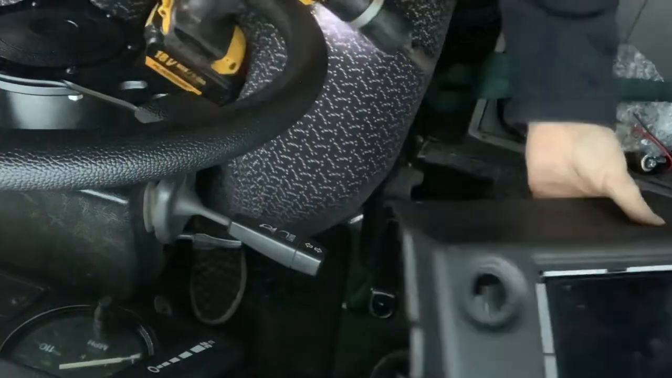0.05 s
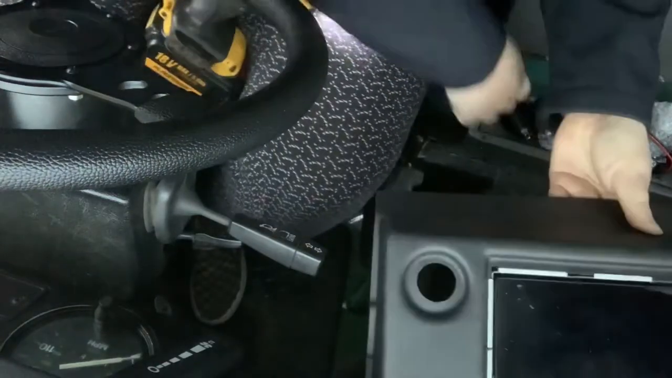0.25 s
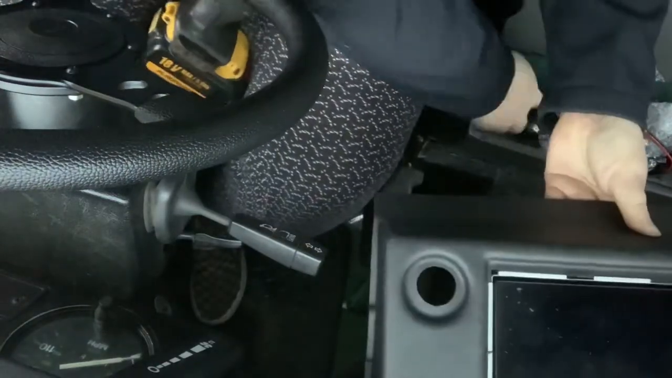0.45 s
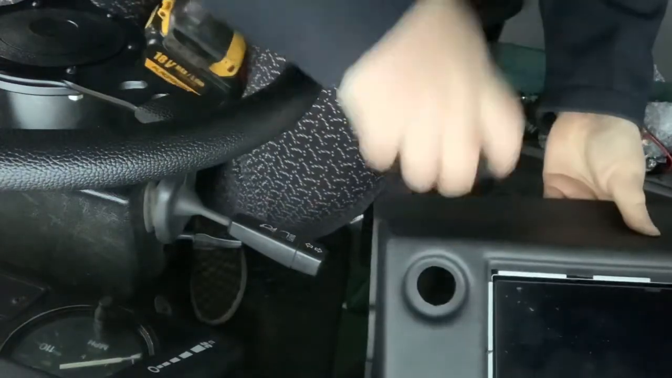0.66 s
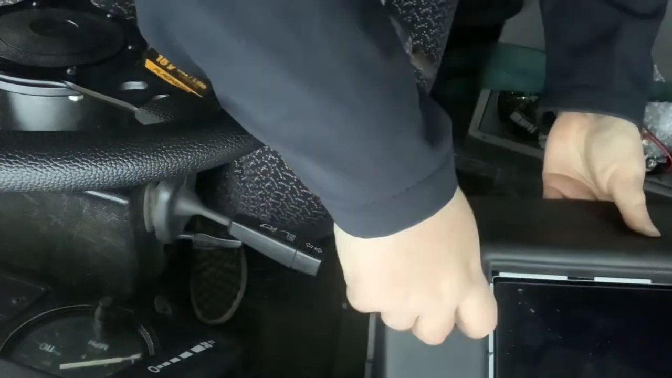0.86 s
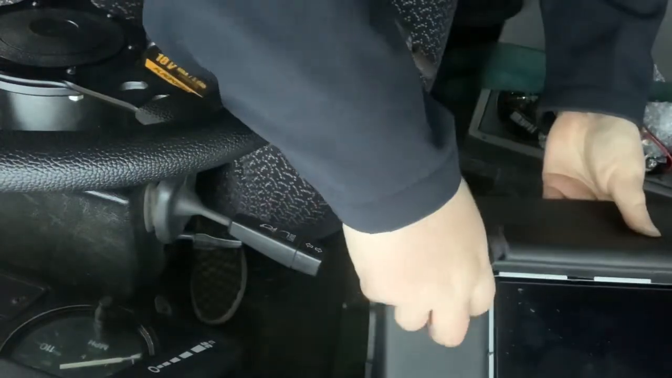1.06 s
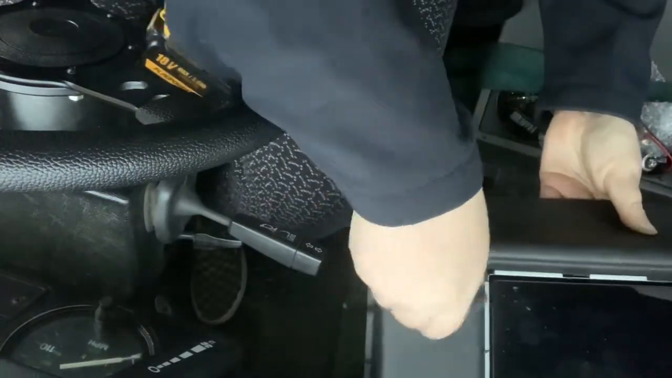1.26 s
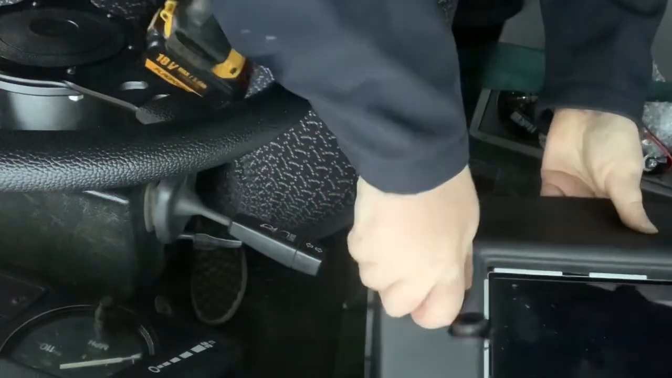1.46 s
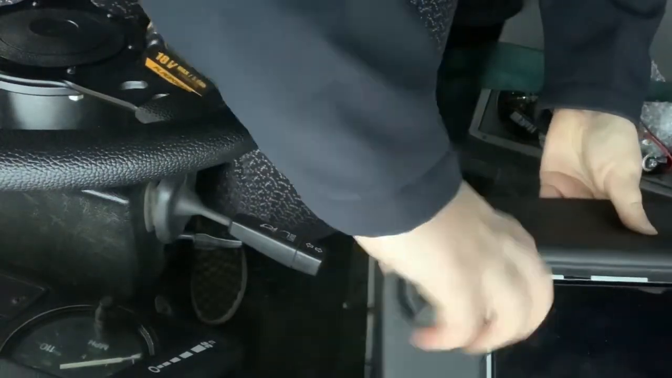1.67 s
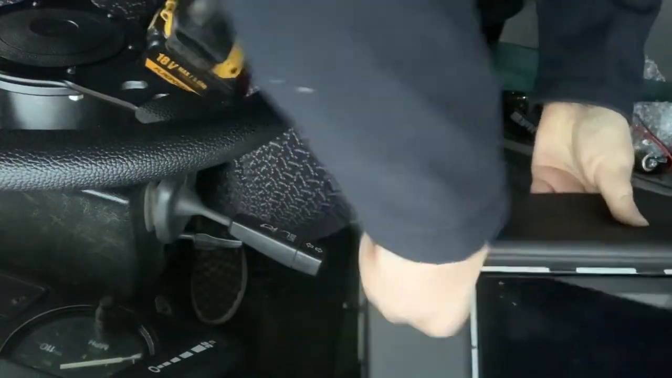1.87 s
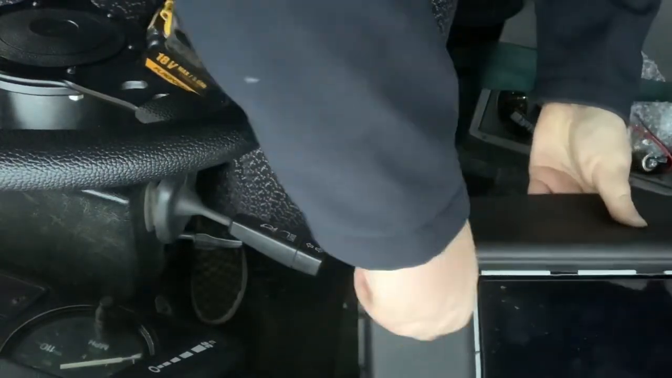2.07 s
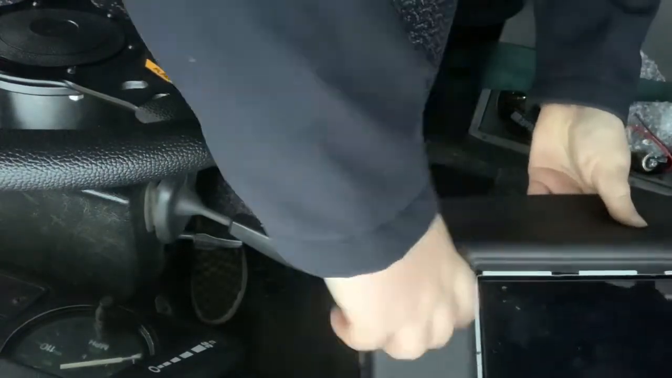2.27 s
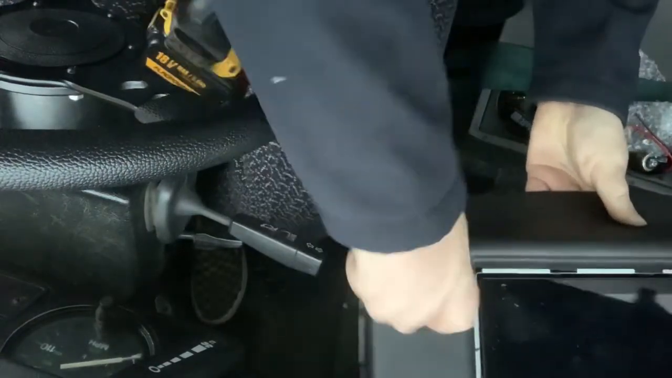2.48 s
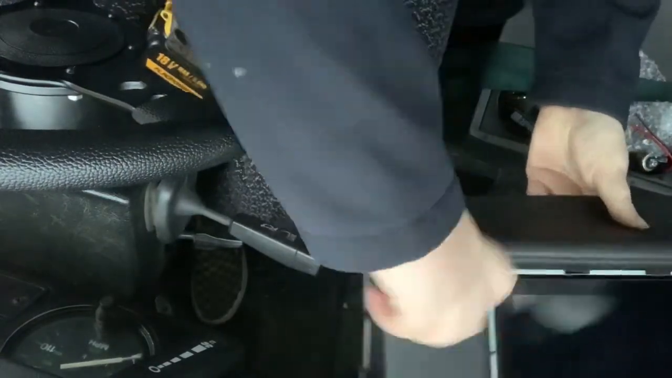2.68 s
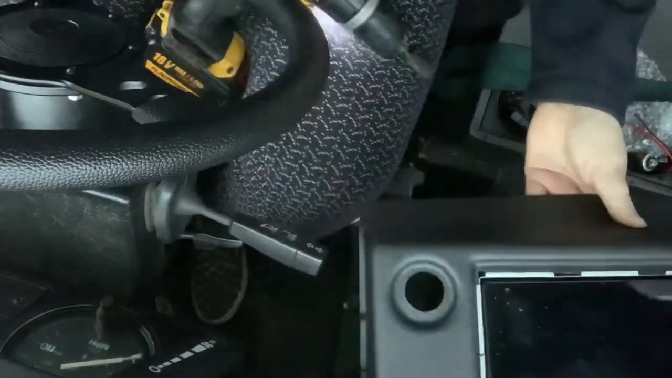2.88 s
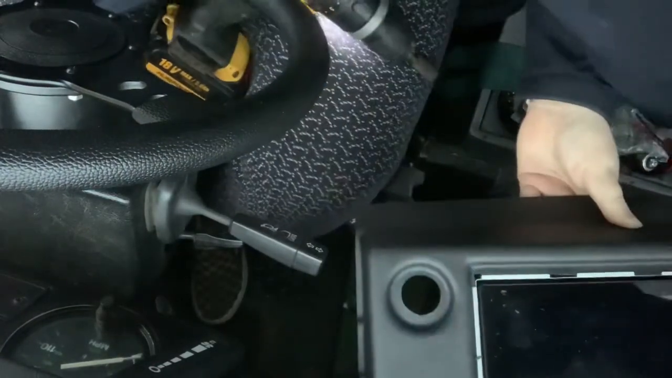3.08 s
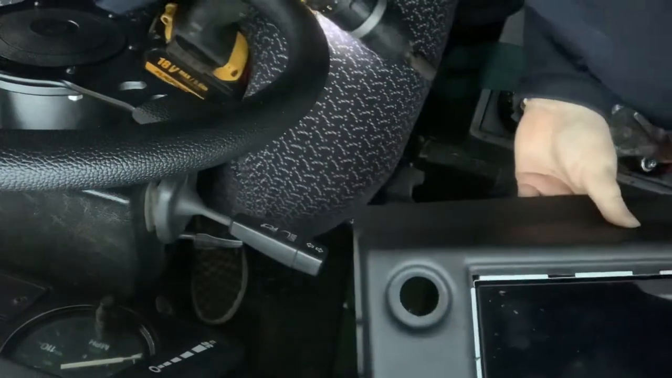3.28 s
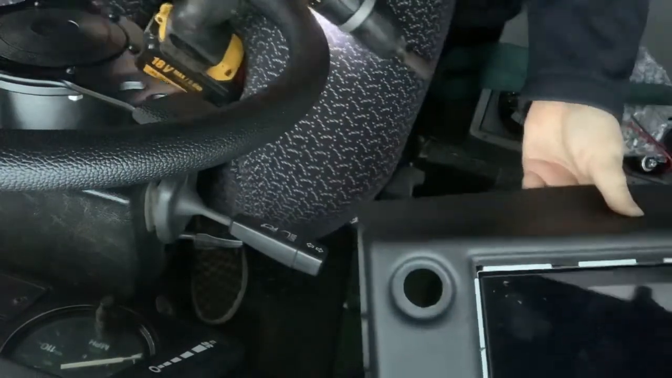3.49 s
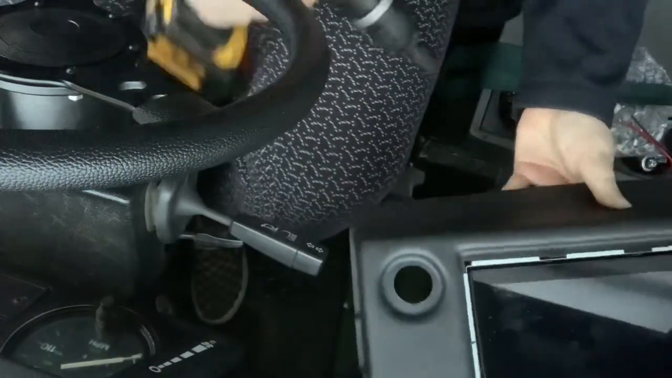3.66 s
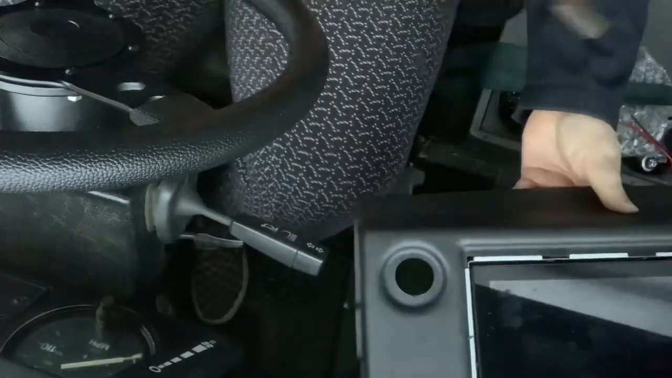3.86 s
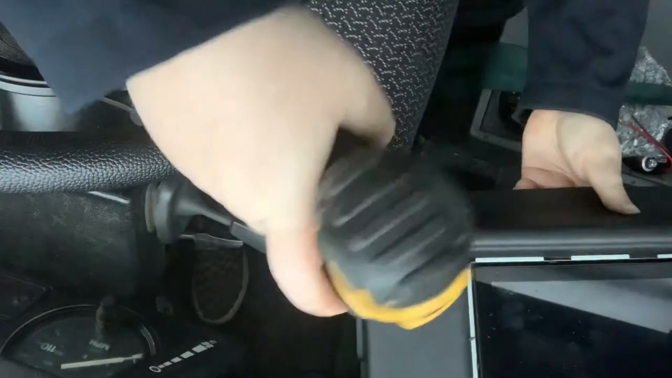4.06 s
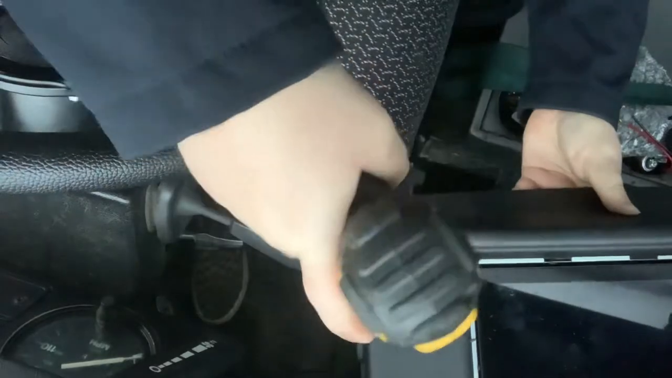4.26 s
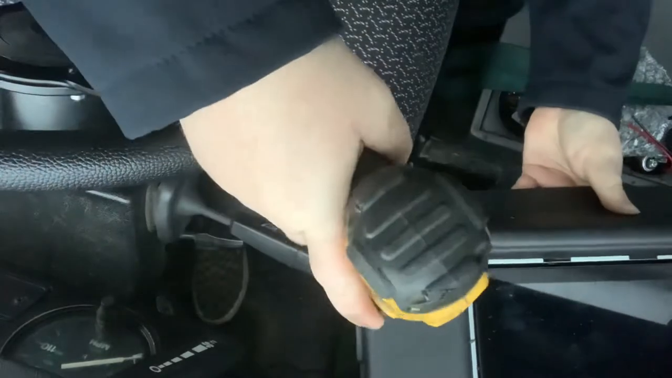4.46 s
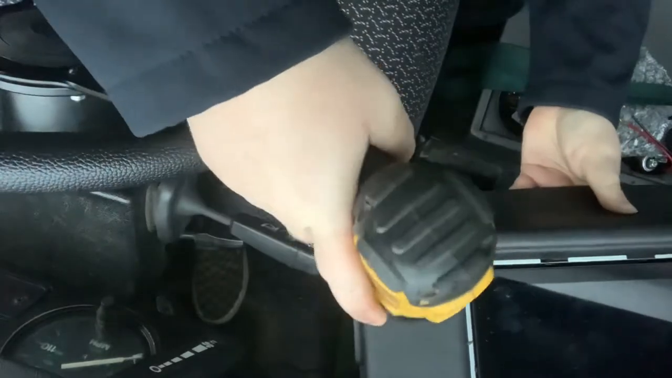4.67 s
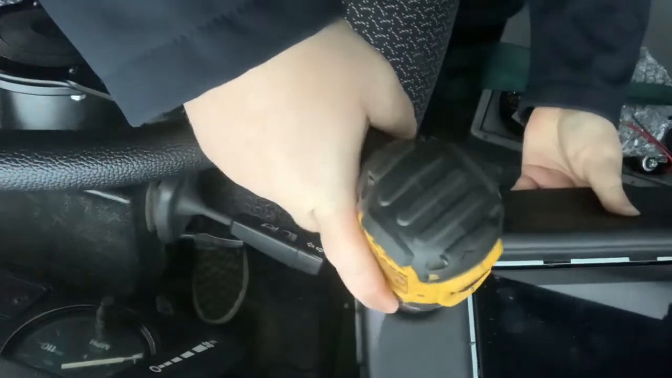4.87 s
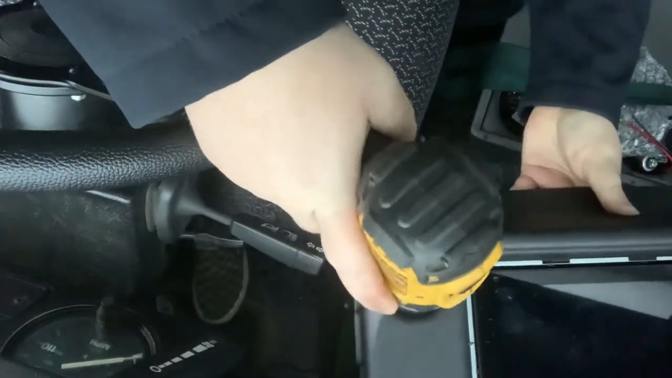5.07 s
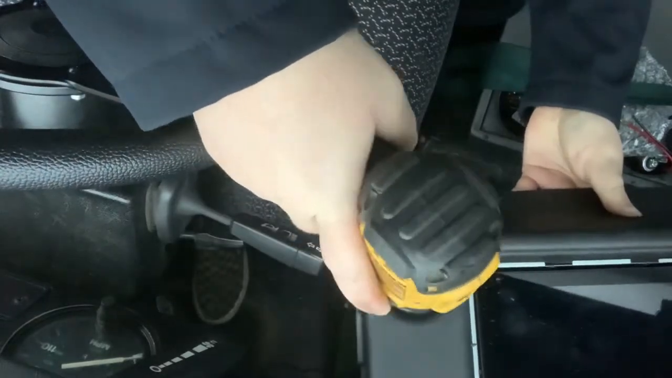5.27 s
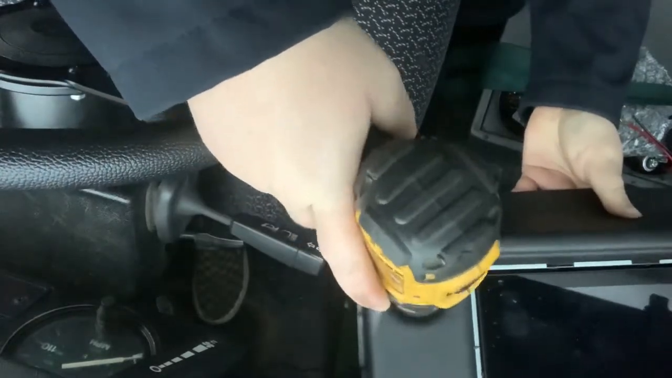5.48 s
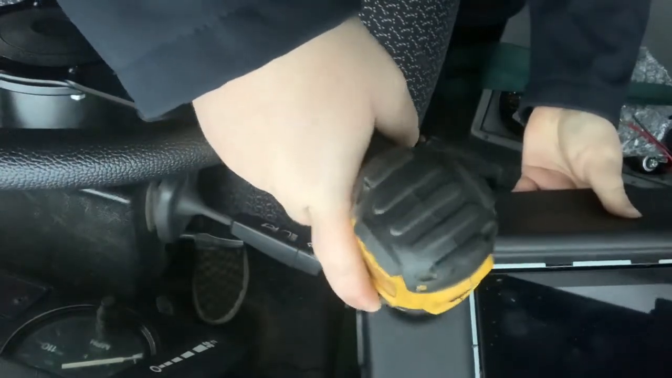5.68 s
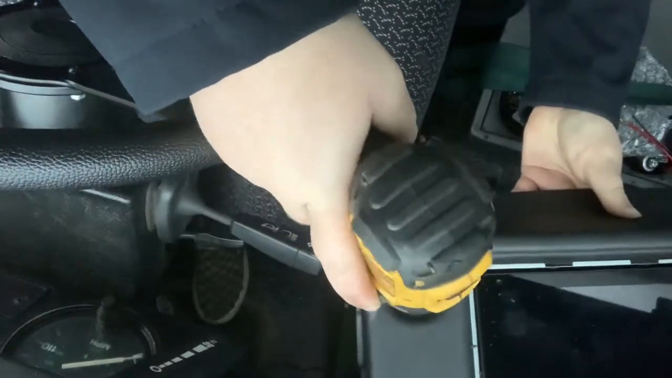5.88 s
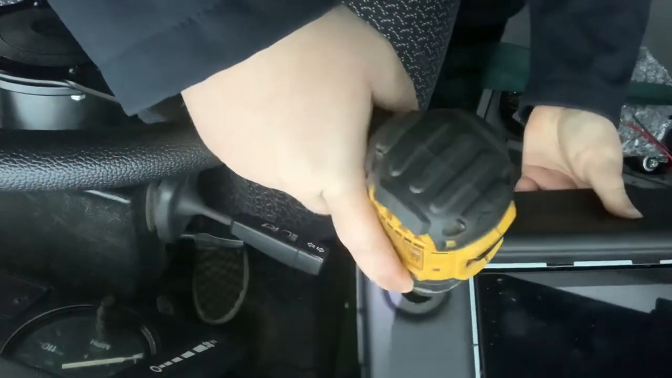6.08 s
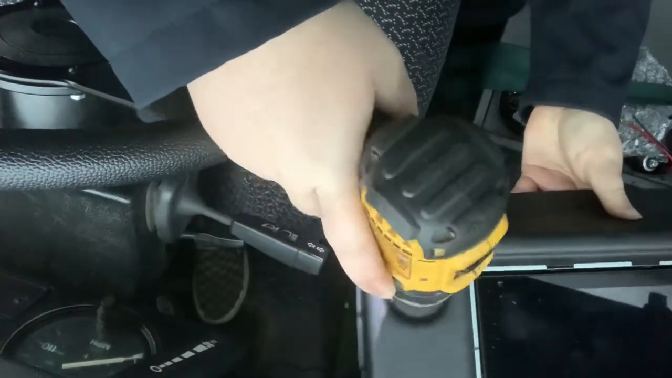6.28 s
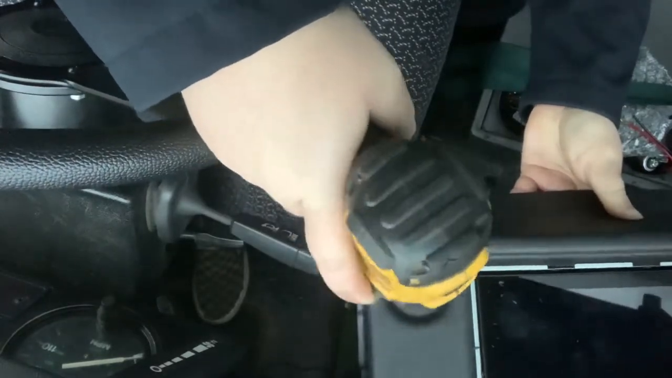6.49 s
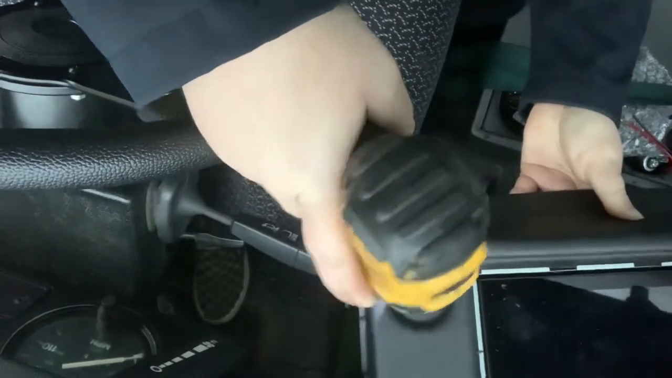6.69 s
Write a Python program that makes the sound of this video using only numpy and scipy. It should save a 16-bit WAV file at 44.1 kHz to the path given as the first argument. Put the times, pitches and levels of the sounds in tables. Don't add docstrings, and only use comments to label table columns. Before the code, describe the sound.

Close, dry stereo sound inside a vehicle cab. From 0 to 0.6 s, sleeve rustle and finger scrapes surround a hollow plastic knock at 0.17. Sharp snaps follow at 0.74 and 0.81, then smaller clicks at 1.05, 1.22, 1.42 and 1.88, mixed with faint taps and dull bumps. A hard double snap lands at 2.76, followed by cloth sliding and another strong click at 3.26. Fabric swishes around 3.5; a clattering, low thump at 3.7 marks the drill being lifted. It touches the panel with a click at 4.27. At about 4.37 the motor starts quickly and runs at steady low speed until the cut-off near 6.7: fluctuating hum in the panel, rough mid-high gear rattle, hissy grinding and short thin squeals, strongest around 5.1 and 5.6. The grind's lower part gradually thickens.

```python
import sys
import numpy as np
from scipy import signal
from scipy.fft import rfft, irfft, next_fast_len
from scipy.io import wavfile
from scipy.ndimage import uniform_filter1d, map_coordinates

SR = 44100
rng = np.random.default_rng(int(sys.argv[2]) if len(sys.argv) > 2 else 0)


def level_to_linear(level):
    exponent = np.asarray(level, float) / 20
    return 10 ** exponent


def wav_out(sig):
    wavfile.write(sys.argv[1], SR, np.round(np.clip(np.atleast_2d(sig).T, -1, 1) * 32767).astype(np.int16))


N = 297229
T = np.arange(N) / SR
CLICK_T = np.arange(SR // 7) / SR
PULL_S = 4.373
GRIND_DB, SONG_REST_DB, RATTLE_REST_DB = -29, -44, -41.5


def unit(x):
    return x / np.sqrt(np.mean(x ** 2) + 1e-20)


def along(points, hz):
    f, v = np.transpose(points)
    return np.interp(np.log(hz + 1), np.log(f + 1), v)


def curves(rows):
    s, *cols = np.transpose(rows)
    return [np.interp(T, s, c) for c in cols]


def wobble(rate):
    return map_coordinates(rng.standard_normal(int(N * rate / SR) + 4), [T * rate])


def filtered(x, response):
    n = x.shape[-1]
    m = next_fast_len(n + 2048, real=True)
    return irfft(rfft(x, m) * response(np.fft.rfftfreq(m, 1 / SR)), m)[..., :n]


def modes(table):
    def response(f):
        total = 0
        for k, (hz, width_hz, db) in enumerate(table):
            damping = 1j * f * width_hz
            total = total + (-1) ** k * level_to_linear(db) * damping / (hz * hz - f * f + damping)
        return total
    return response


def noise(spectrum, lumpy_db, rate):
    raw = level_to_linear(lumpy_db * wobble(rate)) * rng.standard_normal((2, N))
    return unit(filtered(raw, lambda f: level_to_linear(along(spectrum, f))))


def patchy(x, depth_db):
    z = signal.stft(x, nperseg=512)[2]
    field = uniform_filter1d(rng.standard_normal(z.shape[1:]), size=4, axis=0)
    field = uniform_filter1d(field, size=8, axis=1)
    return signal.istft(z * level_to_linear(depth_db * unit(field)), nperseg=512)[1][:, :N]


def swells(s, db, spread_s, rest_db, swing=1):
    coarse = T[::64]
    late = coarse - s[:, None]
    away = np.maximum(late, -late / .9) / spread_s[:, None]
    level_db = np.maximum(rest_db, (db[:, None] - swing * 12 * away).max(axis=0))
    return np.interp(T, coarse, level_db)


def wandering(rows, rest_db, width_hz, beat):
    s, db, spread_s, hz = np.transpose(rows)
    band = filtered(beat * rng.standard_normal((2, 2, N)), lambda f: 1 / (1 + (f / width_hz) ** 3))
    carrier = 2 * np.pi * np.cumsum(np.interp(T, s, hz) + 18 * wobble(18)) / SR
    tone = unit(band[0] * np.cos(carrier) + band[1] * np.sin(carrier))
    return level_to_linear(swells(s, db, spread_s, rest_db)) * tone


def order(k, turns):
    return np.array([np.sin(2 * np.pi * k * turns), np.cos(2 * np.pi * k * turns)])


# time in seconds, speed in turns per second.
SHAFT_SPEED = [
    (4.3, 84),
    (4.4, 92.8),
    (5.2, 93.6),
    (6.74, 92.8),
]


def drill():
    speed, = curves(SHAFT_SPEED)
    turns = np.cumsum(speed * (1 + .007 * wobble(14))) / SR
    blow = level_to_linear(2.53 * rng.uniform(-1.3, 1, N // 300))[turns.astype(int)]
    beat = blow * (0.97 + np.exp(-3 * (turns % 1)))
    spin_db = -34 * np.clip((PULL_S - T) / .05, 0, 1)
    grind_db = grind_level(spin_db)
    trigger = np.clip((T - 4.33) / 0.046, 0, 1)
    return trigger * (panel_hum(turns, grind_db) + gear_rattle(beat, spin_db, grind_db)
                      + bit_song(beat) + bit_grind(beat, grind_db))


def grind_level(spin_db):
    song_db = swells(*np.transpose(SONGS)[:3], SONG_REST_DB)
    first_cut_db = 3 * np.exp(-np.abs(T - PULL_S - .1) / .4)
    return GRIND_DB + spin_db + first_cut_db + .05 * (song_db - SONG_REST_DB)


# time in seconds, main hum in dB, upper hum in dB, spread in seconds.
LEANING = [(4.45, -40, -41, .12), (4.6, -42, -49, .15), (4.7, -49, -41, .08), (4.79, -54, -39, .04),
           (4.89, -38, -52, .09), (5.04, -37, -44, .07), (5.12, -39, -50, .04), (5.25, -41, -46, .14),
           (5.41, -33, -52, .02), (5.55, -55, -52, .15), (5.8, -45, -69, .06), (6.0, -38.5, -47, .08),
           (6.11, -45, -43, .14), (6.4, -56, -46, .1), (6.74, -48, -47.5, .2)]
UPPER_ORDERS = (4, 5, 5.3, 6, 9)
UPPER_ORDERS_DB = (-2, 2.5, -4, -4, -13)
# time in seconds, peak in dB, spread in seconds.
RIM_LOW_NOTE = [
    (4.49, -35, .05),
    (4.63, -35, .06),
    (5.0, -44, .04),
]
# time in seconds, peak in dB, spread in seconds.
RIM_HIGH_NOTE = [
    (4.38, -40, .03),
    (4.5, -36, .06),
    (4.74, -43, .06),
    (5.2, -44, .05),
]
# frequency in Hz, density in dB per Hz.
DRONE_SPECTRUM = [(12, -43), (20, -18), (70, -13.5), (171, -15), (222, -28.5), (272, 4.5), (406, -3),
                  (459, -2.5), (597, -18), (800, -16), (1040, -79), (1760, -120)]


def panel_hum(turns, grind_db):
    s, main_db, upper_db, spread_s = np.transpose(LEANING)
    main_db = swells(s, main_db, spread_s, -68)
    upper_db = swells(s, upper_db, spread_s, -62)
    upper = sum(level_to_linear(db + 5.1 * wobble(9.9)) * order(k, turns)
                for k, db in zip(UPPER_ORDERS, UPPER_ORDERS_DB))
    hum = level_to_linear(main_db + 5.5) * order(3, turns) + level_to_linear(upper_db + 3.5) * unit(upper)
    rim_low_db = swells(*np.transpose(RIM_LOW_NOTE), -70) + 1.5 * wobble(16)
    rim_high_db = swells(*np.transpose(RIM_HIGH_NOTE), -70)
    rim = level_to_linear(rim_low_db) * order(7.9, turns) + level_to_linear(rim_high_db) * order(8.95, turns)
    drone_db = grind_db + 0.4 * (upper_db + 55) - 15
    drone = level_to_linear(drone_db) * noise(DRONE_SPECTRUM, lumpy_db=1.5, rate=27)
    whine = level_to_linear(GRIND_DB - 25 + 4 * wobble(9)) * order(12.08, turns)
    return hum + rim + drone + whine


# time in seconds, peak in dB, spread in seconds, resonance in Hz.
FIRST_STAGE_BITES = [(4.45, -27, .04, 2100), (4.53, -28, .05, 2110), (4.6, -30, .08, 2070),
                     (4.71, -30, .06, 2110), (4.79, -31, .06, 2100), (4.9, -30, .1, 2050),
                     (4.97, -33, .06, 2000), (5.08, -27, .05, 2130), (5.15, -33, .06, 2020),
                     (5.26, -30, .06, 2090), (5.43, -31, .06, 2030), (5.5, -28.5, .04, 2080),
                     (5.62, -31, .06, 2030), (5.8, -35, .12, 2080), (5.99, -30, .04, 2060),
                     (6.06, -32, .07, 1960), (6.2, -39, .08, 2050), (6.33, -31, .06, 2090),
                     (6.38, -28.5, .05, 2110), (6.54, -32, .05, 2150), (6.6, -36, .05, 2080),
                     (6.67, -26, .03, 2130)]
# time in seconds, peak in dB, spread in seconds, resonance in Hz.
SECOND_STAGE_BITES = [(4.39, -33, .06, 1860), (4.56, -36, .08, 1870), (4.73, -27, .07, 1880),
                      (4.87, -35, .08, 1870), (5.31, -29, .04, 1860), (5.4, -35, .06, 1880),
                      (5.57, -33, .06, 1860), (5.64, -32, .04, 1880), (5.71, -33, .04, 1860),
                      (5.93, -34, .07, 1870), (6.1, -33, .05, 1880), (6.2, -37, .07, 1870),
                      (6.47, -32, .05, 1850), (6.72, -30, .03, 1880)]
# frequency in Hz, width in Hz, level in dB.
GEARBOX_MODES = [(1880, 88, 4), (2000, 60, 1), (2097, 78, 3.5), (2267, 55, -3.5)]


def gear_rattle(beat, spin_db, grind_db):
    teeth = wandering(FIRST_STAGE_BITES, RATTLE_REST_DB, 65, beat)
    teeth += wandering(SECOND_STAGE_BITES, RATTLE_REST_DB - 3, 40, beat)
    case = filtered(beat * rng.standard_normal((2, N)),
                    lambda f: modes(GEARBOX_MODES)(f) / (1 + ((f - 2010) / 260) ** 6))
    return level_to_linear(spin_db + 4.3) * teeth + level_to_linear(grind_db - 10) * unit(case)


# time in seconds, peak in dB, spread in seconds, pitch in Hz.
SONGS = [(4.42, -34, .05, 4040), (4.52, -27, .08, 3940), (4.62, -33, .06, 3960), (4.9, -26, .09, 4010),
         (5.01, -30, .06, 3990), (5.12, -24.5, .05, 4000), (5.26, -33, .08, 4010), (5.4, -26.5, .03, 3980),
         (5.51, -28.5, .04, 3990), (5.63, -21, .03, 3990), (5.72, -35, .06, 3960), (5.93, -33, .05, 3980),
         (5.985, -26, .04, 3990), (6.05, -33, .05, 3980), (6.18, -34, .05, 3990), (6.36, -29.5, .09, 3970),
         (6.68, -36, .12, 3980)]


def bit_song(beat):
    return level_to_linear(.7) * wandering(SONGS, SONG_REST_DB, 42, beat)


# frequency in Hz, density in dB per Hz.
GRIND_SPECTRUM = [(350, -15), (600, -3.5), (900, -10), (1700, -6.5), (2400, -1), (2800, -3.5), (4250, -4),
                  (6260, -5), (9730, -5), (12100, -6.5), (15600, -11)]
# frequency in Hz, width in Hz, level in dB.
HOUSING_MODES = [(3030, 80, 1), (3230, 80, -2), (3740, 120, 0), (4650, 130, 2), (5400, 400, -2),
                 (6350, 250, 2), (7130, 200, -2), (7980, 250, 0), (12550, 300, -2)]


def bit_grind(beat, grind_db):
    def colour(f):
        ringing = sum(abs(modes([mode])(f)) ** 2 for mode in HOUSING_MODES)
        return level_to_linear(along(GRIND_SPECTRUM, f)) * np.sqrt(1 + 2 * ringing)
    broad = filtered(beat ** 0.27 * rng.standard_normal((2, N)), colour)
    chips = filtered(broad, lambda f: 1 / (1 + (f / 1250) ** 6))
    deeper_db = 3.2 * (T - 5.6)
    broad = broad + (level_to_linear(deeper_db) - 1) * chips
    return level_to_linear(grind_db + 5.0) * unit(patchy(broad, depth_db=2.6))


# time in seconds, peak in dB, ring in Hz, t60 in seconds.
PART_SNAPS = [(.4652, -40.5, 1900, .03), (.7387, -15.5, 2200, .018), (.8076, -24, 1955, .025),
              (.8224, -26.5, 2180, .018), (.9476, -57, 5700, .043), (1.0463, -19, 3400, .017),
              (1.1767, -42, 3080, .029), (1.223, -23.5, 4540, .026), (1.2456, -35, 2130, .032),
              (1.4206, -23.5, 3420, .026), (1.881, -18, 2600, .021), (2.2462, -41, 1880, .06),
              (2.3051, -32, 2180, .026), (2.604, -32.5, 2080, .026), (2.758, -8.5, 3660, .045),
              (2.7706, -13.5, 4660, .022), (2.7788, -18, 1820, .018), (2.6955, -35, 1950, .02),
              (3.26, -9.5, 2440, .02), (3.7395, -19, 1650, .035), (3.951, -50, 7000, .02),
              (3.918, -45, 4370, .035), (3.9966, -41, 4270, .026), (4.0311, -51, 1500, .031),
              (4.2676, -14, 2150, .018), (4.303, -44.5, 1830, .1)]
# time in seconds, peak in dB, ring in Hz, body in dB.
PANEL_KNOCKS = [(.0186, -35.5, 1740, -2.5), (.17, -16.5, 1800, -2), (.389, -36, 2380, -4),
                (.4198, -45, 2410, 4), (.768, -33, 2160, -1), (1.0933, -48.5, 2050, 3),
                (1.3343, -41.5, 3350, -6), (1.474, -29, 1970, -4), (1.8505, -45.5, 1800, -2),
                (1.9386, -41, 2050, 1), (1.9627, -41, 2070, 1), (1.9766, -33, 2130, -3.5),
                (2.0045, -39.5, 2090, -7), (2.0773, -47.5, 2010, 5), (2.1829, -33, 2160, -.5),
                (2.2685, -45, 2130, -5), (2.426, -43.5, 4660, -3), (2.4688, -50, 1490, 10),
                (2.4976, -48.5, 2100, 7), (2.5619, -42, 5200, 3), (2.6644, -46, 1600, 6),
                (2.7206, -27.5, 1820, 2.5), (3.0365, -33, 1880, -1), (3.3967, -32, 3780, -8),
                (3.6731, -38, 1500, 2), (3.6995, -21.5, 4400, 1), (3.7362, -16, 4400, -4),
                (3.8291, -42.5, 2400, -8), (4.2213, -58, 1680, 15)]


def clicks():
    out = np.zeros((2, N + SR))
    hits = [(s, click(db, hz, t60_s, body_db=-18, lead_db=-26)) for s, db, hz, t60_s in PART_SNAPS]
    hits += [(s, click(db, hz, .043 + .0015 * body_db, body_db, lead_db=-20))
             for s, db, hz, body_db in PANEL_KNOCKS]
    for s, sound in hits:
        out[:, round(s * SR) - 500:][:, :sound.shape[1]] += sound
    return filtered(out[:, :N] + bumps(), lambda f: (1j * f / (110 + 1j * f)) ** 3)


# frequency in Hz, level in dB.
CRACK_SPECTRUM = [(700, -62), (1500, 6.5), (2500, 10.5), (5000, 13), (8000, 1.5), (12000, -3.5),
                  (16000, -4.5)]
# frequency in Hz, width in Hz, level in dB.
PANEL_MODES = [(185, 56, -3.5), (275, 88, 5.5), (343, 63, -3), (514, 47, -10.5)]


def click(db, hz, t60_s, body_db, lead_db):
    t = CLICK_T
    raw = rng.standard_normal((3, 2, len(t)))
    decay = level_to_linear(-60 * t / t60_s) + level_to_linear(-50 - 60 * t / .11)
    shape = (1 - np.exp(-(t / 0.0021) ** 2)) * decay
    snap = unit(filtered(raw[0], lambda f: level_to_linear(along(CRACK_SPECTRUM, f))))
    rub = level_to_linear(lead_db - 60 * t[500:0:-1] / .022) * snap[:, -500:]
    ring = 0
    for ratio, level_db in [(1, 1), (1.12, -4), (1.68, -9)]:
        phase = 2 * rng.standard_normal((2, 1))
        ring = ring + level_to_linear(level_db) * np.sin(2 * np.pi * ratio * hz * t + phase)
    ring = ring * shape ** 1.15
    body = unit(filtered(raw[1], modes([(833, 440, 1), (1460, 460, -2.4)])))
    body = body * level_to_linear(body_db - 60 * t / 0.079) * (1 - np.exp(-t / 0.001))
    knock = unit(filtered(raw[2], modes(PANEL_MODES)))
    knock = knock * level_to_linear(body_db - 7 - 60 * t / 0.096) * (1 - np.exp(-t / 0.0034))
    hit = 0.83 * snap * shape + 0.58 * ring + 0.4 * body + 2.25 * knock
    return level_to_linear(db) * np.hstack([rub, hit])


# time in seconds, peak in dB, pitch in Hz.
DULL_BUMPS = [(.172, -31, 600), (.179, -30, 394), (.353, -41, 332), (1.473, -44, 322), (1.898, -42, 246),
              (1.966, -43, 315), (1.997, -43, 332), (2.084, -40, 233), (2.105, -37, 436),
              (2.127, -37.5, 227), (2.472, -52, 180), (2.568, -42, 265), (2.659, -41.5, 312),
              (2.725, -32, 326), (2.777, -27, 430), (3.049, -41, 317), (3.701, -27, 236), (3.722, -36, 300),
              (3.7402, -14, 275), (3.757, -29, 178), (3.777, -30, 230), (3.792, -33, 260),
              (3.831, -28.5, 223), (3.849, -34, 240), (3.891, -41, 185), (4.22, -48, 262),
              (4.266, -27.5, 334), (4.299, -35, 239), (4.425, -36, 335), (4.685, -30, 360),
              (4.78, -41, 340), (5.39, -31, 255)]


def bumps():
    out, t = np.zeros((2, N + SR)), CLICK_T
    for s, db, hz in DULL_BUMPS:
        raw = rng.standard_normal((2, len(t)))
        loose = unit(filtered(raw, modes([(hz, 60, 0), (1.455 * hz, 120, -6)])))
        tone = np.array([np.sin(2 * np.pi * hz * t), np.cos(2 * np.pi * hz * t)])
        overtone = level_to_linear(-9 - 60 * t / .04) * np.sin(2 * np.pi * 1.9 * hz * t)
        t60_s = .075 - .0017 * (db + 35)
        shape = level_to_linear(db + 13 - 60 * t / t60_s) * (1 - np.exp(-t / 0.0033))
        out[:, round(s * SR):][:, :len(t)] += shape * (tone + overtone + level_to_linear(-3.5) * loose)
    return out[:, :N]


# frequency in Hz, density in dB per Hz.
SLEEVE_SPECTRUM = [(880, -25), (1500, -6.5), (1870, -12.5), (2190, -15), (4140, -5), (6050, -1.5),
                   (6550, -7.5), (9280, -9), (15100, -5), (16200, -51)]
# time in seconds, rustle in dB.
ARM_RUSTLE = [(0, -54), (.23, -49), (.41, -53), (.68, -56.5), (.82, -70.5), (1.06, -78), (1.24, -65),
              (1.61, -61), (2.32, -62), (2.49, -57), (2.76, -67), (2.94, -47), (3.1, -58.5), (3.33, -72),
              (3.52, -42), (3.68, -48.5), (4.06, -61), (4.28, -72)]
# start and end in seconds, first and last level in dB, dull share 0-1.
SLEEVE_SLIDES = [(0, 0.096, -52.5, -44, .7), (0.14, 0.18, -42.5, -35, .6), (0.579, 0.65, -51, -52.5, .3),
                 (1.008, 1.034, -72, -68, 1), (1.074, 1.125, -74, -64, .5), (1.616, 1.65, -64, -69, .3),
                 (2.694, 2.716, -47, -39, .8), (2.9, 3.14, -51, -62, .2), (3.33, 3.442, -51.5, -42, .1),
                 (3.442, 3.655, -51, -73, .1), (3.81, 3.97, -70, -65, 0), (1.89, 2.03, -57, -60, .7),
                 (2.235, 2.29, -58, -62, .7), (2.39, 2.47, -61, -60, .8)]


def sleeve():
    weave = patchy(noise(SLEEVE_SPECTRUM, lumpy_db=1.5, rate=240), depth_db=2)
    soft = filtered(weave, lambda f: 1 / (1 + (f / 9000) ** 3))
    rustle_db, = curves(ARM_RUSTLE)
    cloth = level_to_linear(rustle_db) * soft
    for start, end, first_db, last_db, dull in SLEEVE_SLIDES:
        gate = np.clip((T - start) / .004, 0, 1) * np.clip((end - T) / .004, 0, 1)
        level = level_to_linear(np.interp(T, (start, end), (first_db, last_db)))
        cloth = cloth + gate * level * (weave + dull * (soft - weave))
    return cloth


# frequency in Hz, density in dB per Hz.
SCRAPE_SPECTRUM = [(400, -38), (600, 4.5), (900, -2.5), (1400, -10), (2100, -2.5), (3000, -18), (4500, -56)]
# frequency in Hz, density in dB per Hz.
FLEX_SPECTRUM = [(15, -75), (25, -36), (49, -44.5), (98, -27), (175, -8), (254, 1.5), (387, -7), (482, -7),
                 (663, -16), (800, -24.5), (1040, -36), (1760, -120)]
# time in seconds, scrape in dB, flex in dB, spread in seconds.
PANEL_GRIPS = [(0, -45, -54, .15), (.35, -59, -53.5, .2), (1.07, -62.5, -59, .09), (1.31, -64, -54, .05),
               (1.62, -61, -55, .12), (1.92, -90, -54, .15), (2.2, -63, -52, .12), (2.49, -72, -53, .12),
               (2.73, -46, -53, .07), (3.48, -53, -52, .11), (3.83, -56, -53, .07), (4.22, -65, -57, .16)]


def hands():
    s, grip_db, flex_db, spread_s = np.transpose(PANEL_GRIPS)
    scrape_db = swells(s, grip_db, spread_s, -85)
    skin = level_to_linear(scrape_db + 2.5) * noise(SCRAPE_SPECTRUM, lumpy_db=4.5, rate=33)
    rumble_db = np.where(T < PULL_S - .06, swells(s, flex_db, spread_s, -57, swing=.35), -52)
    rumble = level_to_linear(rumble_db + 7.5) * noise(FLEX_SPECTRUM, lumpy_db=1.5, rate=30)
    return (sleeve() + skin) * (T < 4.36) + rumble


# frequency in Hz, share of the left sound heard at right 0-1.
PORT_ALIKE = [(60, .97), (110, .85), (150, .5), (200, .4), (270, .88), (600, .82), (1200, .7), (2000, .8),
              (4000, .65), (8000, .5), (12000, .4)]
# frequency in Hz, phase in radians.
PORT_TURN = [(110, -.3), (190, -1.2), (270, -2.5), (650, -2.7), (900, -1), (1760, -.8), (1830, -4.5),
             (2150, -4.6), (2500, -4.4), (2900, -3.4), (4000, -4.8), (4500, -3.6), (5500, -3.2),
             (6400, -1.4), (8500, -2.6), (13000, -4.6)]
# frequency in Hz, left over right in dB.
PORT_TILT = [(30, 0), (100, 1.5), (300, 1.2), (700, 1.8), (1500, 4), (3000, 2), (6000, 1.8), (10000, .4),
             (15000, -.3)]


def ports(shared, own):
    def right(f):
        alike = along(PORT_ALIKE, f)
        gain = level_to_linear(-along(PORT_TILT, f) / 2) * np.exp(1j * along(PORT_TURN, f))
        return gain * [alike, np.sqrt(1 - alike ** 2)]
    left = filtered(shared, lambda f: level_to_linear(along(PORT_TILT, f) / 2))
    return np.array([left, filtered(np.array([shared, own]), right).sum(axis=0)])


# time in seconds, nearness to the left port in dB.
HANDS_LEFT = [
    (0, 1),
    (.7, 2),
    (2.2, 2.5),
    (2.7, 0),
    (3.7, -1),
    (4.3, 0),
]


def scene():
    side_db, = curves(HANDS_LEFT)
    shared, own = drill() + clicks() + hands()
    return ports(shared, own) * level_to_linear([side_db / 2, -side_db / 2])


def roll_off(x):
    return signal.sosfilt(signal.butter(12, 16300, fs=SR, output="sos"), x)


def record(dry):
    heard = filtered(dry, lambda f: np.clip((15950 - f) / 400, 0, 1))
    heard = heard / (1 + abs(heard / .62) ** 4) ** (1 / 4)
    return roll_off(heard)


dry = scene()
out = record(dry)
wav_out(out)
```